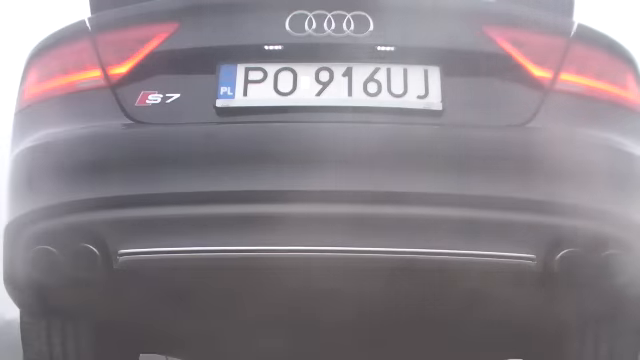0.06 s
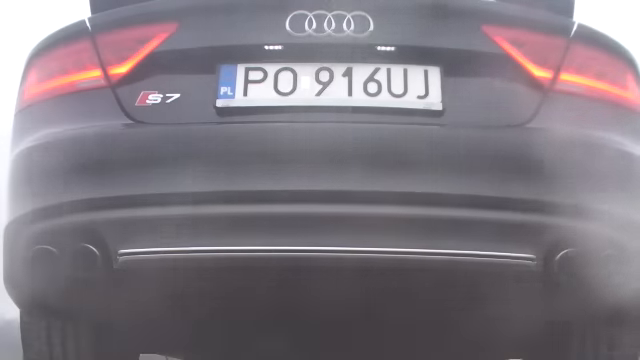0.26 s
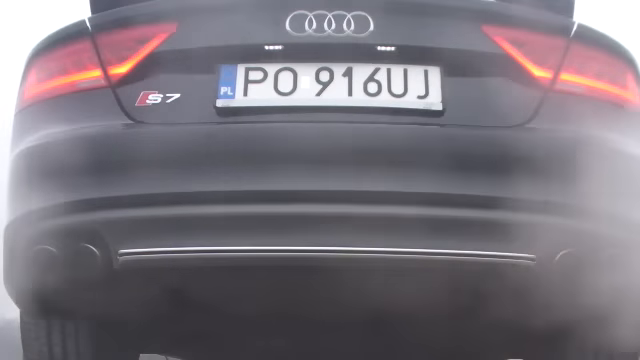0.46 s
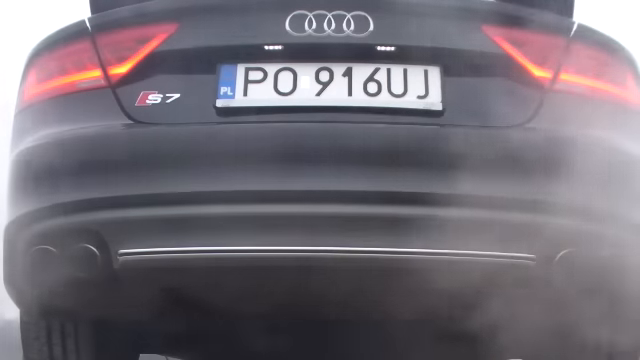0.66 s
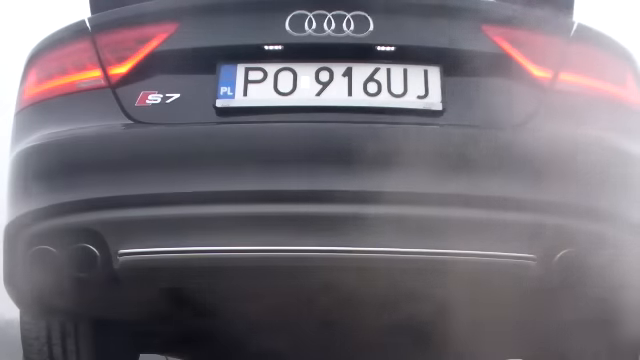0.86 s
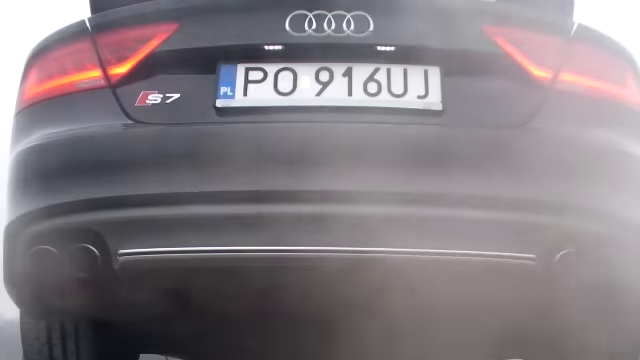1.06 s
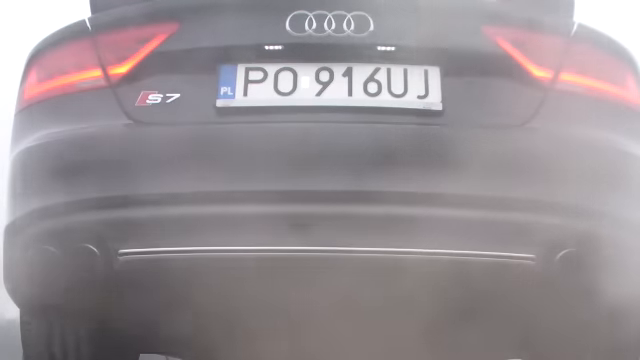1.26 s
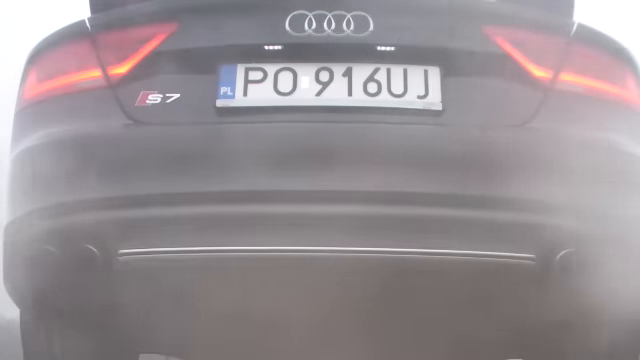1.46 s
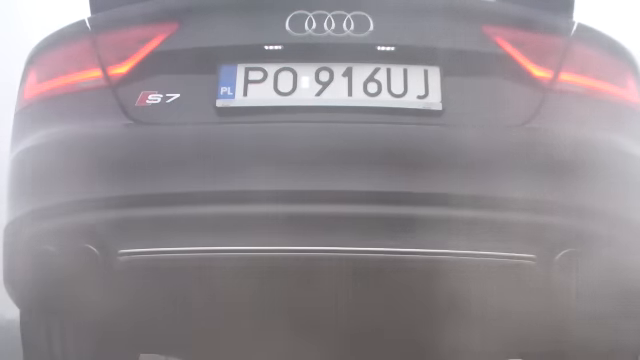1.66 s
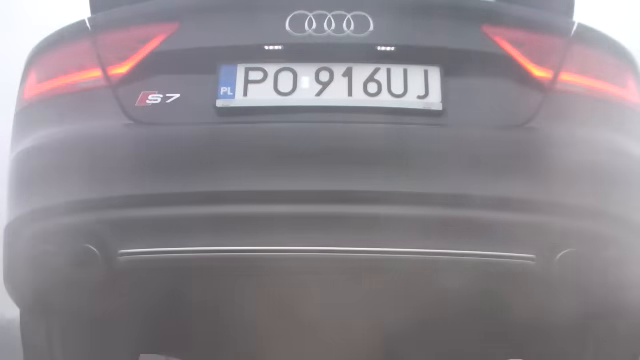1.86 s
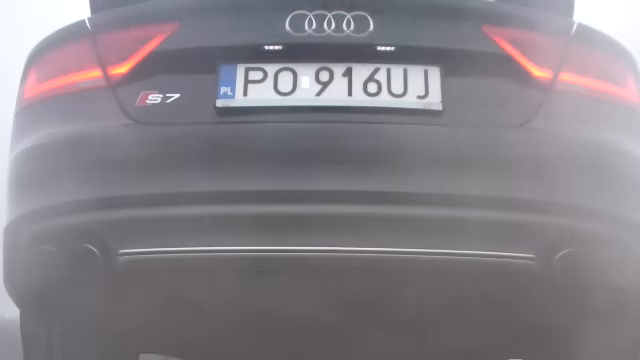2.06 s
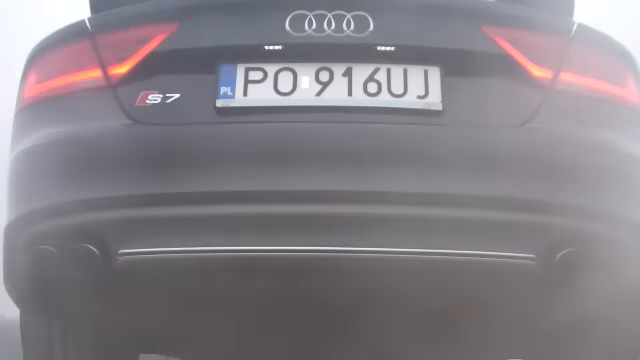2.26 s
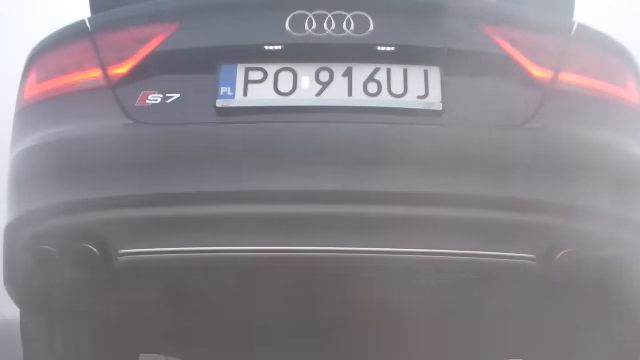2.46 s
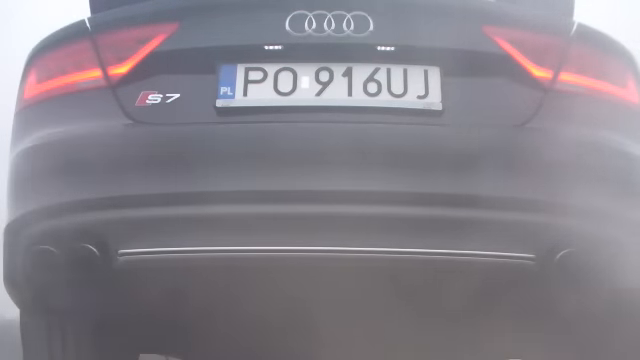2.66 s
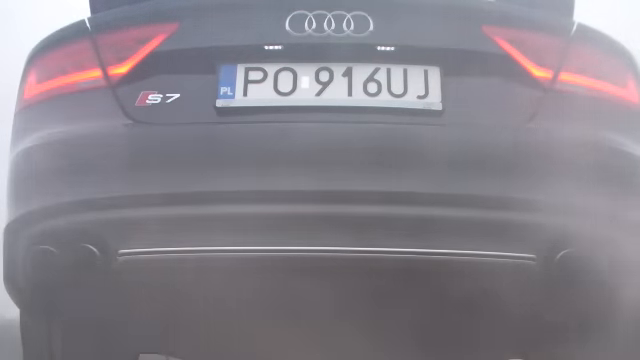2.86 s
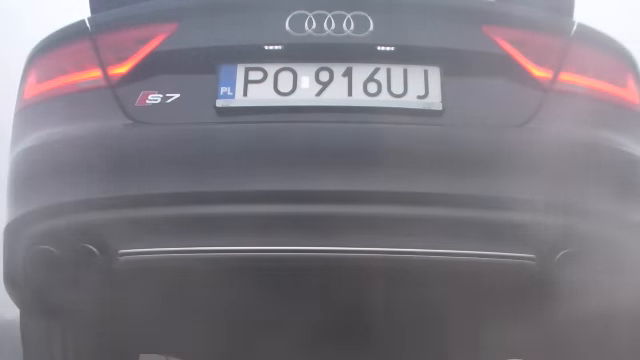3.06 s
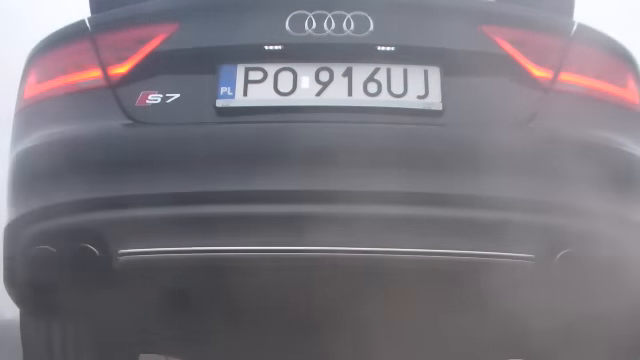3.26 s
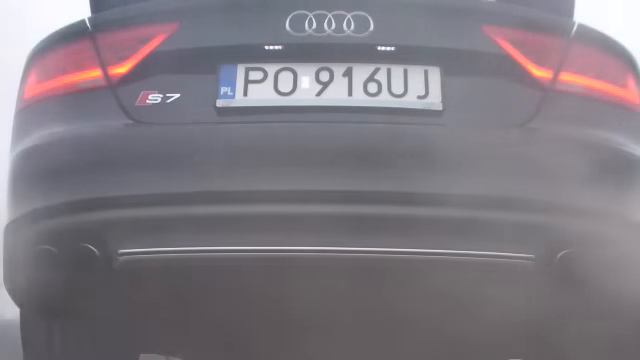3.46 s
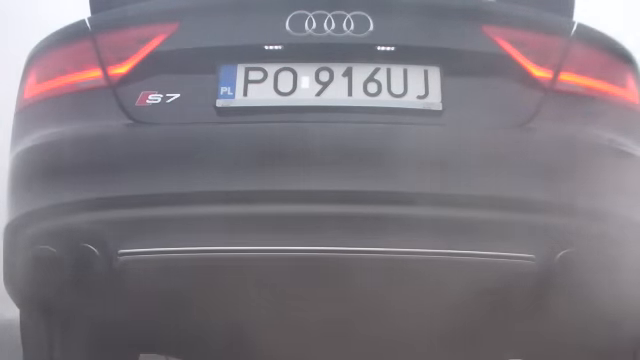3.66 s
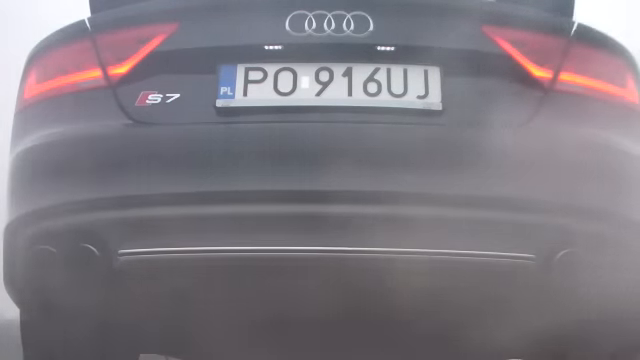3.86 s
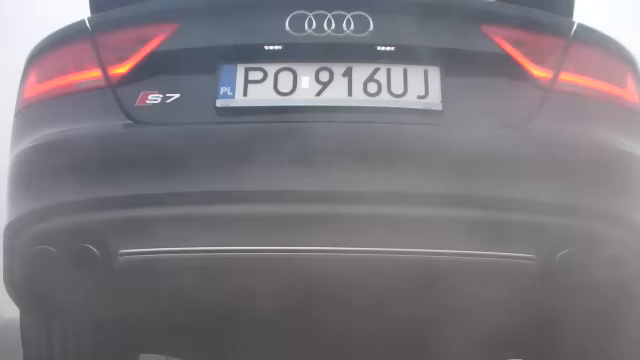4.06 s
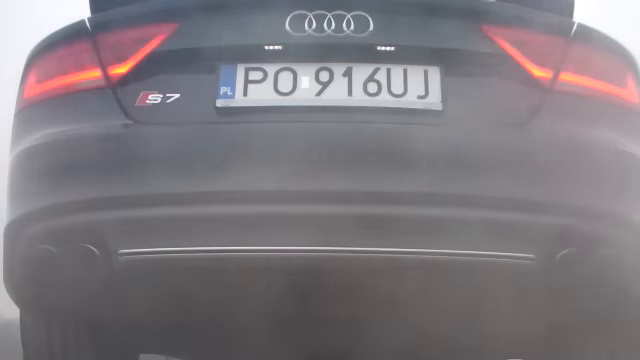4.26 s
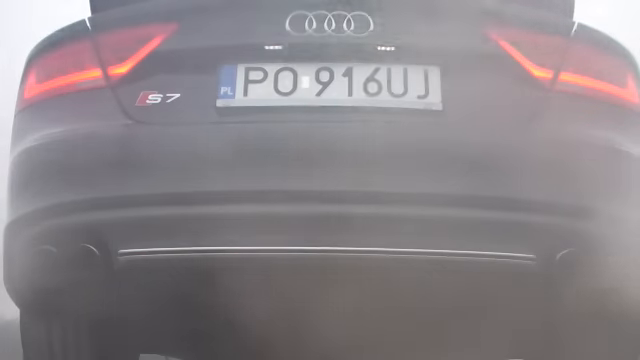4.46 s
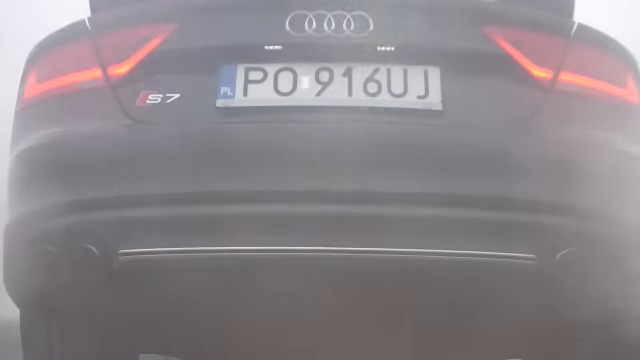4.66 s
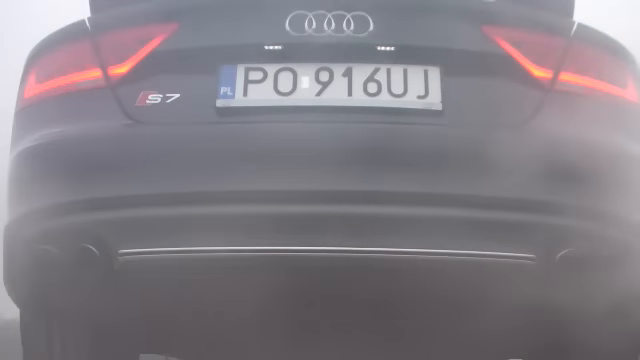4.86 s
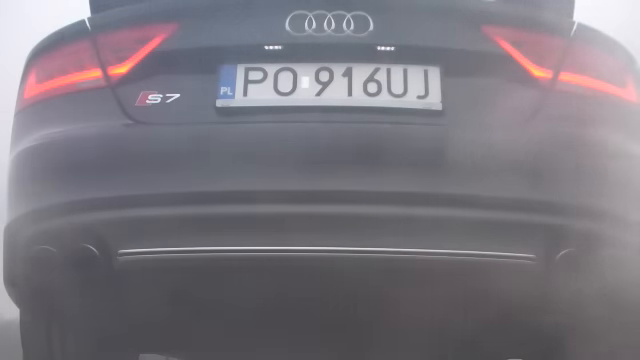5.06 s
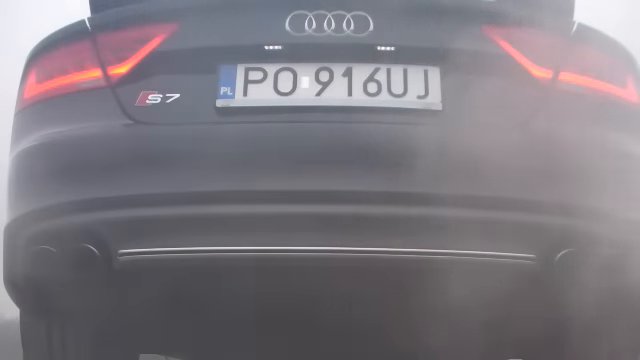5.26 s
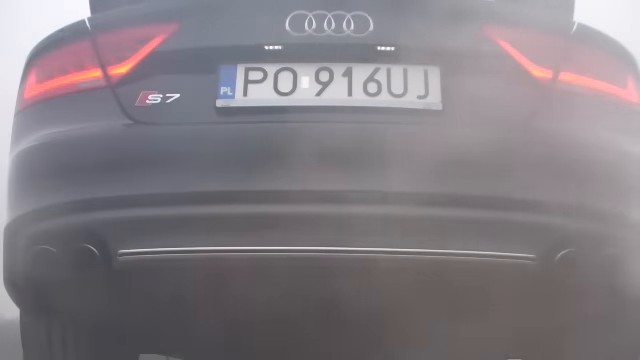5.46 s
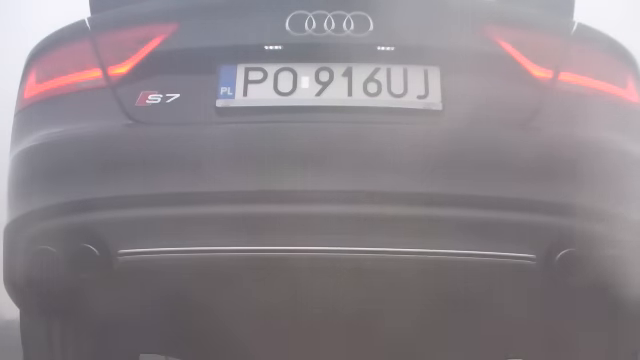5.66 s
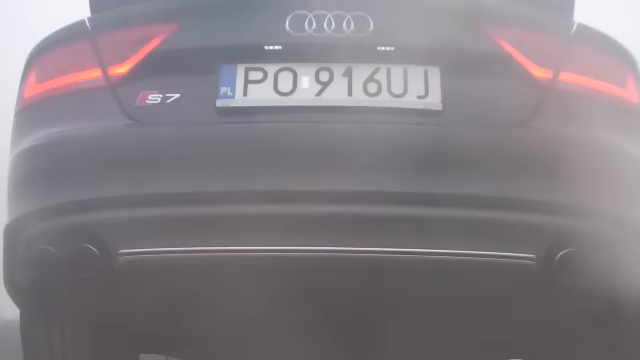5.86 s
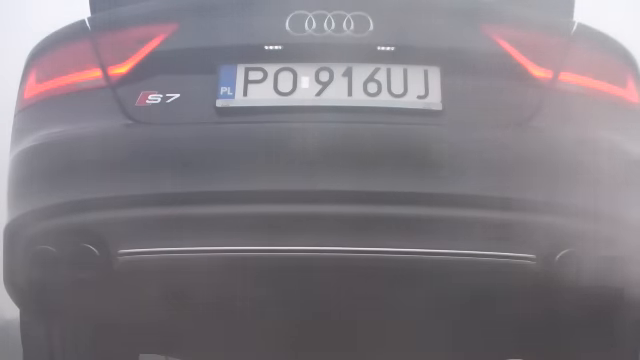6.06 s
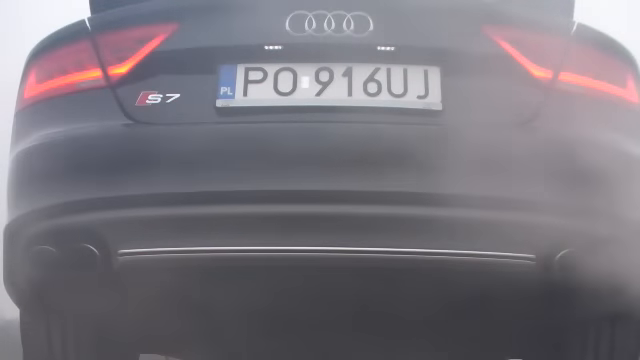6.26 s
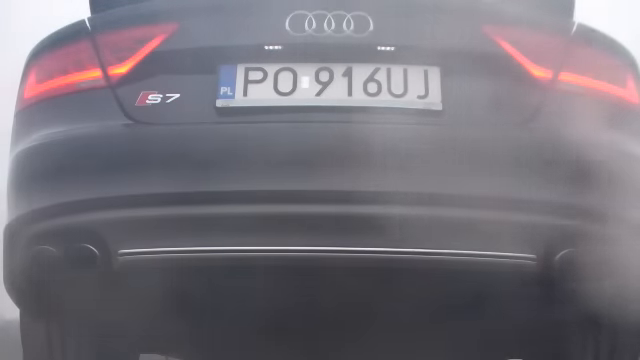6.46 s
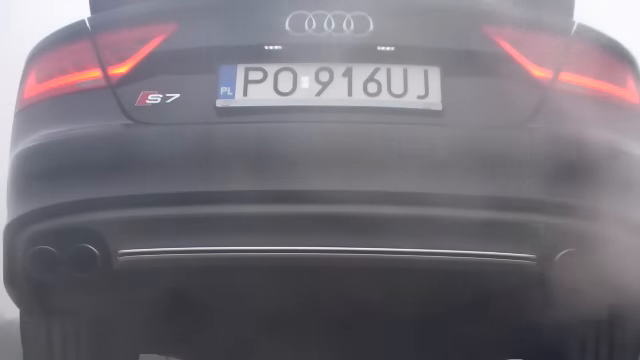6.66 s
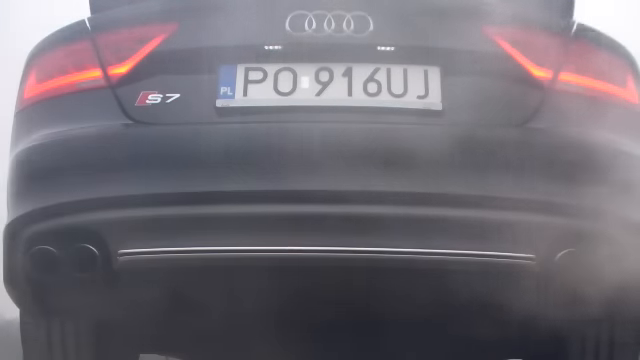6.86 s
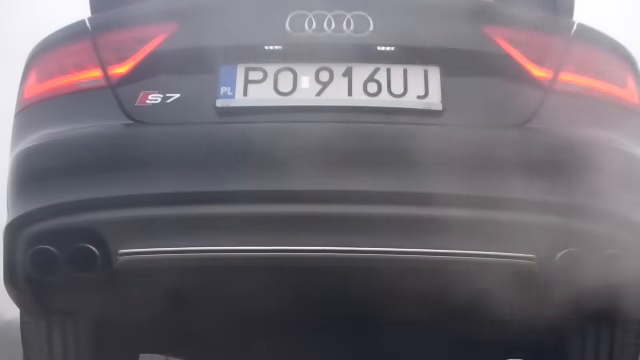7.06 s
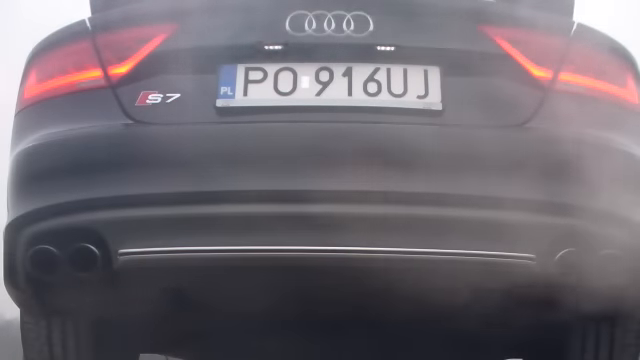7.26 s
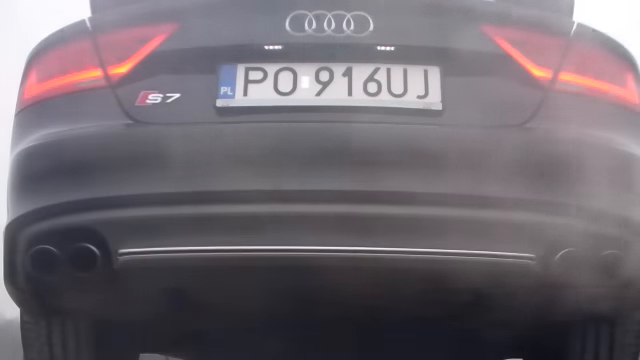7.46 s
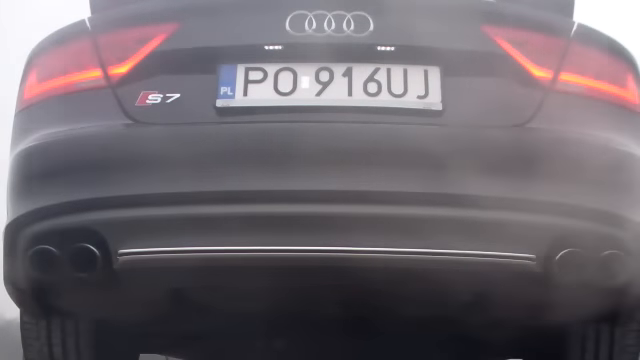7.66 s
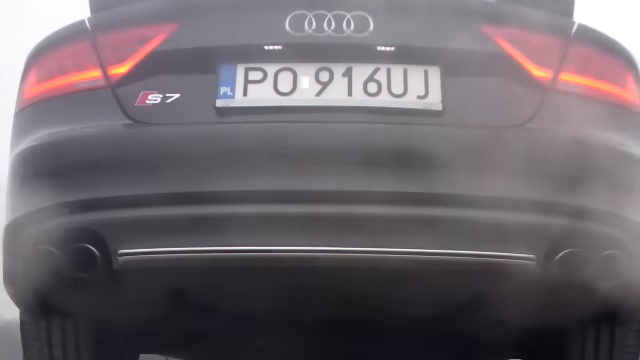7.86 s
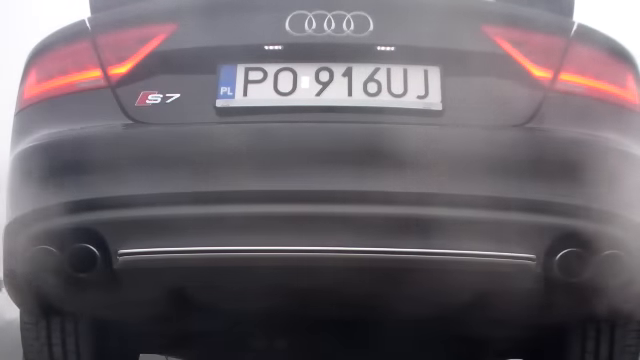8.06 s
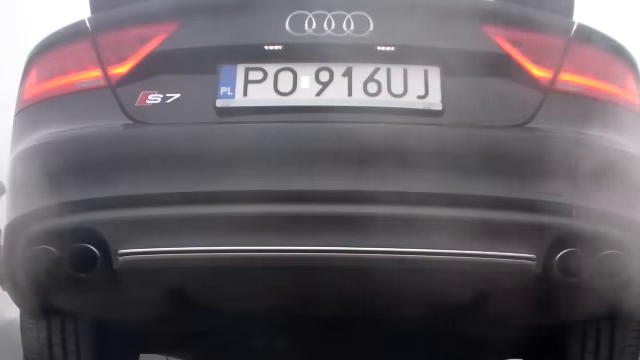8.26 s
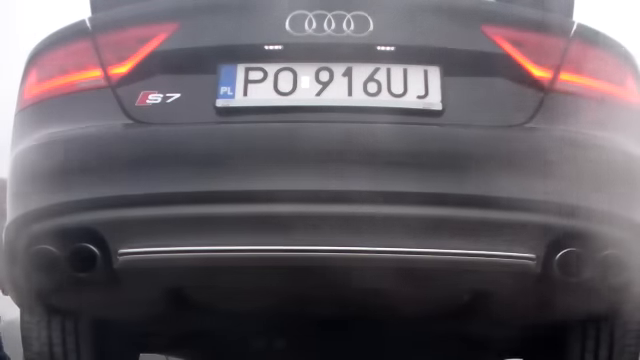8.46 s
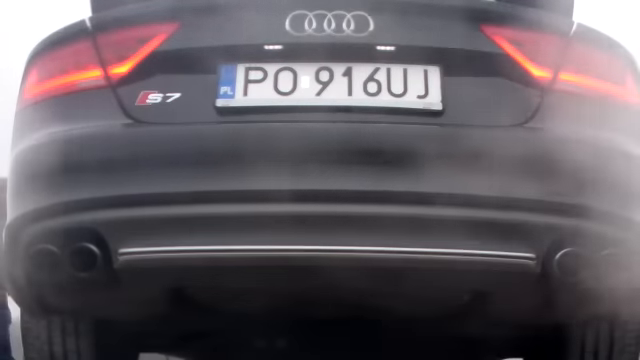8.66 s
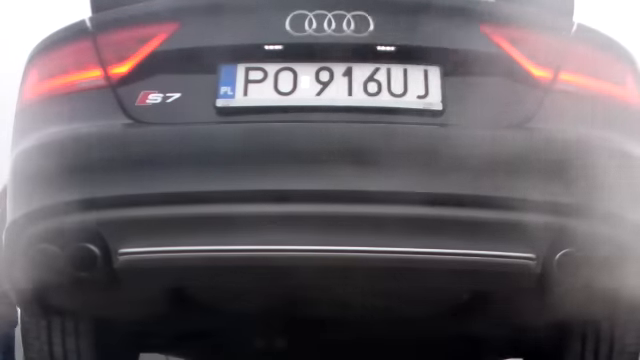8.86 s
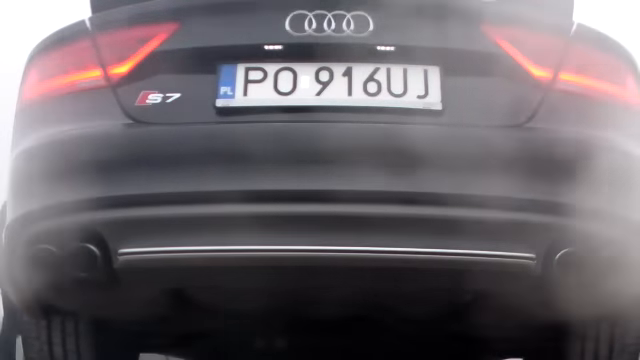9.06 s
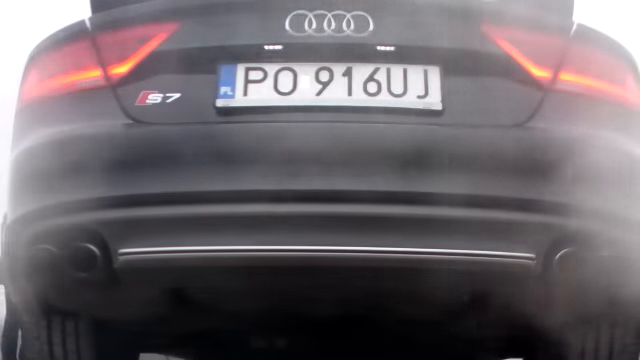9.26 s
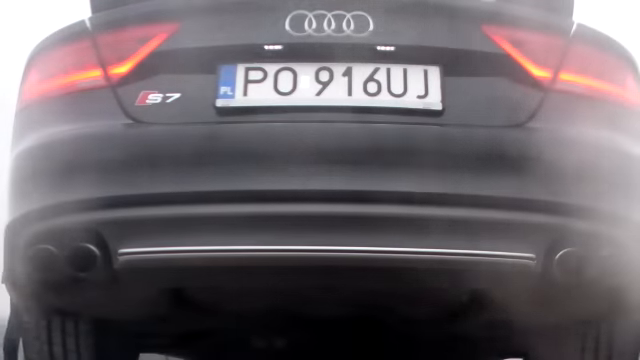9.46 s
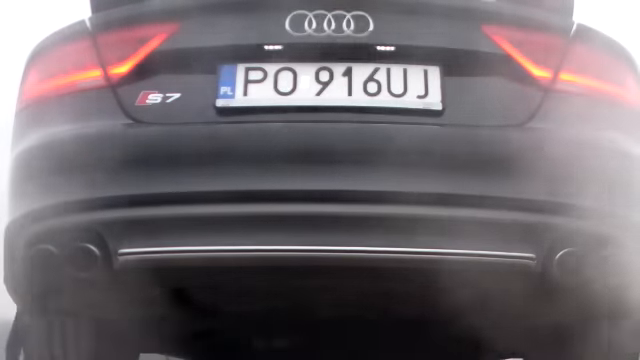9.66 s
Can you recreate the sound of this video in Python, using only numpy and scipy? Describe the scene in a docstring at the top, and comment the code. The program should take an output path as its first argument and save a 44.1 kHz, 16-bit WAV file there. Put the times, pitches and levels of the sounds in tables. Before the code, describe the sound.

A powerful eight-cylinder car engine is revved in sharp roaring blips behind its tail pipes, barking and spitting, dropping back to lumpy idle between bursts.

```python
"""An eight-cylinder engine is revved in blips against its limiter and falls back to idle, heard behind the tail
pipes. Tones locked to two unevenly firing banks boom through the pipe resonances; ragged blows and noise ring
the silencer. Coloured noise hisses as gas flow and spits at the pipe mouths; shut throttles bring thuds, late
burns bark. At high speed and roar a pitched howl sets in and a buzz rattles with the loudest peaks. A thin
geared tone whines now and then, and steady noise is the hush of the yard."""
import sys
import numpy as np
from scipy import signal
from scipy.fft import rfft, irfft
from scipy.io import wavfile
from scipy.ndimage import uniform_filter1d, minimum_filter1d

SR = 44100
rng = np.random.default_rng(int(sys.argv[2]) if len(sys.argv) > 2 else 0)


def volts(x):
    """Linear amplitude factor 10**(x/20) for a level x in dB, scalar or array-like."""
    e = np.asarray(x, float) / 20
    return 10 ** e


def int16_out(signal):
    """Quantize to a 16-bit WAV file."""
    q = np.round(np.clip(np.atleast_2d(signal).T, -1, 1) * 32767)
    wavfile.write(sys.argv[1], SR, q.astype(np.int16))


N = 428652
TIME = np.arange(N) / SR

# Openings of the throttle; pull is before the speed scaling in speed()
# [opens_s, shuts_s, pull_hz_per_s, roughness_0_to_1]
THROTTLE = [(.208, .832, 123.3, .87), (1.17, 1.42, 124.5, .55), (1.42, 2.05, 108, .97),
            (3.27, 3.718, 151.3, .54), (4.366, 4.822, 110.4, .5), (7.522, 7.835, 147.8, .24),
            (8.497, 9.089, 151.8, .45)]
# Steady exhaust levels against engine cycle rate [speed_hz, boom_db, roar_db, hiss_db]
STEADY = [(5.86, -46, -53.5, -60), (6.39, -34.5, -49, -58), (9.1, -27.5, -41, -50), (13.5, -28.5, -36, -49),
          (17.43, -29, -33, -48), (20.45, -26.5, -29, -43.5), (23.62, -28.5, -29, -43),
          (28.79, -26, -23, -42.5), (30.464, -28, -23, -42)]
# Surges of burnt gas over the steady level [start_s, peak_s, end_s, roar_rise_db, hiss_rise_db]
SURGES = [(0.208, 0.489, 0.63, 11.5, 10.5), (0.557, 0.691, 0.86, 10.5, 9.5),
          (1.229, 1.343, 1.437, 15.5, 15.5), (1.464, 1.567, 1.63, 14, 12.5), (1.753, 1.82, 1.84, 7.5, 5.5),
          (1.938, 2.019, 2.25, 4, 3), (3.36, 3.694, 3.783, 13.5, 14), (4.377, 4.556, 4.85, 12.5, 12),
          (4.614, 4.747, 4.88, 3.5, -2), (7.676, 7.858, 7.98, 7, 8.5), (8.626, 8.981, 9.27, 12.5, 13),
          (9, 9.078, 8.78, 7.5, 1)]
# Brief changes in the level of the gas hiss [time_s, hiss_change_db]
HISS_CHANGES = [(.556, -2), (.638, -2), (1.415, 2), (4.41, -4)]
# Relative strength of each cylinder's blow, in firing order [level_db]
CYLINDER_DB = [6.5, -15.5, 4, -28, 4.5, -13.5, 0.5, 4.5]
# Tones of the uneven firing, relative [multiple_of_cycle, coasting_db, firing_db]
FIRING_TONES = [(2, -22, -14.5), (3, -2, -7.5), (4, -13, -3.5), (5, -2, -5), (6, -6.5, -5), (7, -11, -7),
                (8, -5, 2), (9, -10.5, -11.5), (10, -12, -11), (11, -5, -15)]
# Transmission of the tail pipes [frequency_hz, gain_db]
PIPE_RESPONSE = [(20, -37), (45, -0.5), (75, 1.5), (100, 1), (125, 4), (150, 0.5), (200, -13), (240, -10),
                 (300, -25), (500, -46), (1500, -95)]
# Harder firings that make the idle lumps lurch [time_s, rise_db]
LOPES = [(6.3, 5), (6.451, 9), (6.585, 7), (6.7, 4), (6.85, 6), (6.96, 13.5), (7.125, 9), (7.27, 5),
         (7.385, 10), (7.555, 8)]
# Resonances of the silencer chambers [frequency_hz, width_hz, gain_db]
SILENCER_MODES = [(374.8, 36, -7.5), (435, 42, 0), (490.3, 46.4, -1), (546, 28, -1.5), (601.4, 55, -4.5),
                  (736, 121, -14), (793, 226, -23), (345, 83, -14.5)]
# Tones of the howl, relative [multiple_of_cycle, level_db]
HOWL_TONES = [(12, -15), (14, 2), (16, 1.5), (18, -8.5), (20, -6.5)]
# Spectrum of the gas hiss, relative [frequency_hz, level_db_per_hz]
HISS_SPECTRUM = [(530, -3), (900, -1), (1060, -8.5), (1430, -15), (1980, -11.5), (2200, -11.5), (3610, -4),
                 (4300, -12), (5620, -13.5), (6000, -17.5), (7050, -19.5), (7770, -13.5), (10100, -10),
                 (11800, -20.5), (15400, -53), (22000, -120)]
# Whine passages, before their random waver [start_s, end_s, multiple_of_cycle, level_db]
WHINES = [(-.1, .2, 52, -47), (.6, .95, 28, -39), (1.45, 2.15, 28, -36), (2.65, 3.05, 52, -52),
          (4.65, 5.05, 28, -39), (5.5, 5.8, 52, -48)]
# Spectrum of the yard hush, relative [frequency_hz, level_db_per_hz]
YARD_SPECTRUM = [(88, -36), (150, -0.5), (245, -3.5), (575, -1.5), (1590, -22), (5560, -32.5), (6790, -31),
                 (11500, -32), (15000, -62), (22000, -120)]
# Unburnt fuel spitting at the pipe mouths, held and then fading [start_s, level_db, hold_s]
SPITS = [(0.488, -38, 0.009), (0.518, -32.5, 0.0071), (0.579, -23, 0.021), (0.665, -33, 0.01),
         (0.873, -42, 0.013), (1.275, -39, .01), (1.326, -47, 0.011), (1.367, -32.5, .008),
         (1.427, -29.5, 0.029), (1.568, -37, 0.011), (2.016, -47, .01), (2.624, -51, 0.0089),
         (3.462, -45, 0.017), (3.507, -44, 0.0081), (3.633, -38, .01), (4.247, -42.5, 0.0083),
         (4.468, -39, 0.011), (4.537, -59, 0.0067), (5.337, -46, 0.013), (5.38, -47.5, 0.022),
         (5.997, -49, 0.0091), (8.854, -47, 0.0071), (8.896, -48, 0.011), (8.932, -44, 0.012),
         (8.963, -34, 0.012), (8.9984, -29.5, 0.012)]
# Late burns barking into the silencer [time_s, peak_db]
BARKS = [(0.521, -9), (0.577, -8), (0.662, -7), (0.677, -5), (0.686, -3), (0.865, -10), (.915, -14),
         (1.289, -3.5), (1.335, 1), (1.358, -25), (1.545, 1), (1.577, -5), (3.604, -10), (3.642, -8.5),
         (3.685, -23), (4.459, -10.5), (4.554, -16), (4.584, -3), (4.618, -6.5), (4.721, -8), (8.944, -3.5),
         (8.998, -9.5), (9.033, -5.5), (9.064, -7)]
# Thuds as the throttle shuts [time_s, level_db, pitch_hz]
THUDS = [(0.839, -12.5, 83), (1.437, -15, 69.6), (1.859, -18, 67.6), (1.997, -12.5, 69.4),
         (3.751, -12, 53.74), (4.772, -12.5, 62.4), (9.12, -19, 88)]

# Engine speed, in four-stroke cycles per second; the pull fades over the band below the limiter
START_HZ, IDLE_HZ, LIMITER_HZ, LIMITER_BAND_HZ = 17.86, 5.76, 32.23, 9.21
# Friction grows with speed and eases off near idle over CATCH_HZ
DRAG_HZ_PER_S, DRAG_PER_S, CATCH_HZ, INTAKE_LAG_S, STEP_S = 13.89, .195, 2.85, .033, .005
FIRE_LAG_S, GAS_LAG_S = .05, .019
# Above HARD_DB of roar the shaft overshoots and the howl grows in
HARD_DB, HOWL_OVER_DB, OVERSHOOT_HZ_PER_DB = -23, 7, .12
HOWL_FROM_HZ, HOWL_FULL_HZ, HOWL_SHARE = 26, 30, .85
# Coasting through this speed the pipes drone
DRONE_HZ, DRONE_WIDTH_HZ, DRONE_DB = 24.74, 2.1, 8
# The flow sags as each surge starts; the boom stumbles as the throttle opens; the roar drops at each thud
SAG_DB, SAG_S, STUMBLE_DB, STUMBLE_S, STUMBLE_LAG_S = -1.5, .017, -3.5, .039, .042
SHUT_DB, SHUT_S, HISS_CHANGE_S = -5, .03486, .0077
BOOM_SHARE = .59  # dB of boom rise per dB of roar rise
REFIRE_HZ, COAST_ROUGH, IDLE_ROUGH = 13.4, .1, .55
COAST_WOBBLE_DB, FIRE_WOBBLE_DB = 1.9, 1.1
LOPE_S, BETWEEN_LOPES_DB = .03, -3
# Once a cycle the gas puffs; its decay is a share of the cycle
PUFF_MAX_DB, PUFF_SHARE = 3.4, .25
WAVER, WAVER_HZ = .008, 9  # relative pitch waver of the whine and its rate
YARD_DB, SPIT_T60_S = -50.5, .055
LIMIT, LIMIT_S, TOP_HZ = .95, .012, 11900


def unit(x):
    """Normalise a signal to unit rms pressure."""
    return x / np.sqrt(np.mean(x ** 2))


def coloured(x, points):
    """A transfer function shapes the spectrum, its dB gain interpolated over log frequency."""
    hz, db = np.transpose(points)
    bins = np.fft.rfftfreq(N, 1 / SR) + 1
    gain = volts(np.interp(np.log(bins), np.log(hz), db))
    return irfft(rfft(x) * gain, N)


def ring(x, hz, width_hz):
    """Two cascaded resonators give one steep resonance with unit gain at its centre."""
    stage = np.concatenate(signal.iirpeak(hz, hz / width_hz, fs=SR))
    return signal.sosfilt(np.tile(stage, (2, 1)), x)


def walk(rate_hz):
    """Band-limited fluctuation: held random levels smoothed twice, with spread near 1."""
    hold = int(SR / rate_hz)
    steps = np.repeat(rng.standard_normal(N // hold + 1), hold)
    return 1.3 * uniform_filter1d(uniform_filter1d(steps, hold), hold)[:N]


def span(start, end, fade_s):
    """A gate: 1 between two times, fading linearly at both ends."""
    return np.clip(np.minimum(TIME - start, end - TIME) / fade_s + .5, 0, 1)


def bump(x, width):
    """A Gaussian pulse of height 1 about x = 0."""
    return np.exp(-(x / width) ** 2)


def speed():
    """Angular momentum balance: throttle torque lifts the shaft to the limiter, friction returns it to idle."""
    t = np.arange(0, N / SR, STEP_S)
    pedal = sum(pull * np.interp(t, TIME, span(start, end, .03)) for start, end, pull, _ in THROTTLE)
    hz, air, out = START_HZ, 0, []
    for pull in pedal:
        air += (pull - air) * STEP_S / INTAKE_LAG_S
        limiter = min(max((LIMITER_HZ - hz) / LIMITER_BAND_HZ, 0), 1)
        push = air * hz / LIMITER_HZ * limiter
        drag = (DRAG_HZ_PER_S + DRAG_PER_S * hz) * np.tanh((hz - IDLE_HZ) / CATCH_HZ)
        hz += STEP_S * (push - drag)
        out.append(hz)
    return np.interp(TIME, t, out)


def fuelled(fade_s):
    """Delayed combustion: for each throttle opening, 1 while the cylinders get fuel."""
    return np.array([span(start + FIRE_LAG_S, end + FIRE_LAG_S, fade_s) for start, end, _, _ in THROTTLE])


def any_fuel(fade_s):
    """Combustion over all openings together, from 0 (coasting) to 1 (fuelled)."""
    return np.clip(fuelled(fade_s).sum(axis=0), 0, 1)


def levels(hz):
    """Source strength follows gas flow: boom, roar and hiss in dB from engine speed and surges."""
    at_hz, *columns = np.transpose(STEADY)
    boom_db, roar_db, hiss_db = (np.interp(hz, at_hz, column) for column in columns)
    # the flow at the pipe mouths trails the shaft
    hiss_db = np.interp(TIME - GAS_LAG_S, TIME, hiss_db)
    shapes = np.array([np.interp(TIME, row[:3], [0, 1, 0]) for row in SURGES])
    sag_db = sum(SAG_DB * bump(TIME - row[0], SAG_S) for row in SURGES)
    surge_db, gas_db = np.array(SURGES)[:, 3:].T @ shapes + sag_db
    gas_db += sum(db * bump(TIME - s, HISS_CHANGE_S) for s, db in HISS_CHANGES)
    boom_db += DRONE_DB * bump(hz - DRONE_HZ, DRONE_WIDTH_HZ) * (1 - any_fuel(.05))
    boom_db += sum(STUMBLE_DB * bump(TIME - row[0] - STUMBLE_LAG_S, STUMBLE_S) for row in THROTTLE)
    roar_db += sum(SHUT_DB * bump(TIME - row[0] - SHUT_S / 2, SHUT_S) for row in THUDS)
    return boom_db + BOOM_SHARE * surge_db, roar_db + surge_db, hiss_db + gas_db


def blows(cycles, scatter_db, signed):
    """An impulse train, eight unequal firings a cycle, scaled to keep its power steady at any speed."""
    at = np.flatnonzero(np.diff(np.floor(8 * cycles)))
    chance = rng.standard_normal((N // 100, 2))[:len(at)]
    size_db = np.resize(CYLINDER_DB, len(at)) + scatter_db * chance[:, 0]
    sign = 1 - signed + signed * chance[:, 1]
    spacing = np.gradient(1. * at)
    out = np.zeros(N)
    out[at] = volts(size_db) * sign * np.sqrt(spacing)
    return unit(out)


def boom(hz, cycles):
    """Periodic firing excites a harmonic series through the pipes; unequal firings add random lumps."""
    throttle = any_fuel(.042)
    # a coasting engine only pumps air until fuel returns near idle
    refire = 1 / (1 + (hz / REFIRE_HZ) ** 6)
    firing = np.maximum(throttle, refire)
    pulled_rough = np.transpose(THROTTLE)[-1] @ fuelled(.041)
    rough = pulled_rough + (1 - throttle) * (COAST_ROUGH + IDLE_ROUGH * refire)
    rough = np.clip(rough, 0, .95)
    tones, power = 0, 0
    pipe_hz, pipe_db = np.transpose(PIPE_RESPONSE)
    for k, coast_db, fire_db in FIRING_TONES:
        source_db = coast_db + firing * (fire_db - coast_db)
        passed_db = np.interp(np.log(k * hz), np.log(pipe_hz), pipe_db)
        wobble_db = (COAST_WOBBLE_DB + FIRE_WOBBLE_DB * firing) * walk(13)
        gain = volts(source_db + passed_db + wobble_db)
        tones = tones + gain * np.sin(2 * np.pi * (k * cycles + rng.random()))
        power = power + gain ** 2 / 2
    tones = tones / np.sqrt(uniform_filter1d(power, SR // 8))
    # near idle the firings lope unevenly
    lope_db = BETWEEN_LOPES_DB * refire + sum(db * bump(TIME - s, LOPE_S) for s, db in LOPES)
    lump_source = blows(cycles, scatter_db=2.1, signed=.98) + 1.02 * rng.standard_normal(N)
    lumps = unit(coloured(lump_source, PIPE_RESPONSE)) * volts(2 * refire * walk(12) + lope_db)
    return np.sqrt(1 - rough ** 2) * tones + rough * lumps


def buffet(boom_db):
    """Low-frequency turbulence that follows the boom level."""
    points = [(20, -10), (45, 11), (120, 14), (400, -39)]
    return volts(boom_db - 17) * unit(coloured(rng.standard_normal(N), points))


def silencer(push):
    """Modal superposition: parallel chamber resonances ring with whatever pushes them."""
    return sum(volts(db) * ring(push, hz, width_hz) for hz, width_hz, db in SILENCER_MODES)


def ragged_roar(cycles):
    """Forced resonance: soft firing blows and once-a-cycle bursts of turbulence drive the silencer."""
    soft = coloured(blows(cycles, scatter_db=1.5, signed=.25), [(450, 0), (600, -5), (800, -14), (2000, -45)])
    burst_db = 1.5 * walk(30) + 6 * np.exp(-(cycles % 1) / PUFF_SHARE)
    turbulence = volts(burst_db) * .75 * rng.standard_normal(N)
    return unit(silencer(.9 * soft + turbulence))


def gas_noise():
    """Jet noise: a coloured common part, with an opposed part between the sides mostly in the treble."""
    mid, other = (unit(coloured(rng.standard_normal(N), HISS_SPECTRUM)) for _ in range(2))
    points = [(1000, -67), (2200, -21.5), (3500, -44.5), (4200, -17), (5000, -6), (8000, -9.5), (11000, -6.5)]
    side = coloured(other - .18 * mid, points)
    return mid + side * np.array([[1], [-1]])


def gas_flutter(cycles):
    """Amplitude modulation of the gas flow: random flutter and a puff of random size each cycle."""
    flutter = volts((1.1 + .3 * any_fuel(.05)) * walk(45))
    size = rng.random(N // 1000)[cycles.astype(int)]
    puff_db = PUFF_MAX_DB * size * np.exp(-(cycles % 1) / PUFF_SHARE)
    return unit(flutter * volts(puff_db))


def whine(cycles):
    """A gear ratio fixes a thin tone to the shaft; its pitch and level waver and it fades in and out."""
    cycles = np.cumsum(np.gradient(cycles) * (1 + WAVER * walk(WAVER_HZ)))
    tones = sum(volts(db) * span(start, end, .043) * np.sin(2 * np.pi * k * cycles)
                for start, end, k, db in WHINES)
    return tones * volts(2.5 * walk(15))


def yard():
    """A diffuse ambient field: steady coloured noise with a weak opposed part between the sides."""
    mid, side = (unit(coloured(rng.standard_normal(N), YARD_SPECTRUM)) for _ in range(2))
    return volts(YARD_DB) * (mid + volts(-34) * side * np.array([[1], [-1]]))


def howl(cycles):
    """Mode locking: firings locked to the silencer sound as shaft harmonics of wavering level and phase."""
    return unit(sum(volts(db + 2.7 * walk(25)) * np.cos(2 * np.pi * k * cycles + .5 * walk(20))
                    for k, db in HOWL_TONES))


def roar(hz, cycles, hard_db):
    """Power-sharing crossfade: the howl displaces the ragged roar at high speed and strong flow."""
    fast = np.interp(hz, [HOWL_FROM_HZ, HOWL_FULL_HZ], [0, 1])
    share = HOWL_SHARE * fast * np.minimum(hard_db / HOWL_OVER_DB, 1)
    return share * howl(cycles) + np.sqrt(1 - share ** 2) * ragged_roar(cycles)


def rasp(pressure):
    """Threshold nonlinearity: only the strongest pressure swings set off a buzz near 3.5 kHz."""
    excess = np.clip(np.abs(pressure) - .2, 0, None)
    buzz = uniform_filter1d(excess, SR // 700) * rng.standard_normal(N)
    return volts(-6) * ring(buzz, 3520, 990)


def spits():
    """Burst envelopes of burning fuel: a 4 ms rise, a hold and an exponential decay."""
    out = np.zeros(N)
    for s, db, hold_s in SPITS:
        decay_db = -60 * np.clip(TIME - s - hold_s, 0, 1) / SPIT_T60_S
        rise = np.clip((TIME - s) / .004 + .5, 0, 1)
        out += volts(db + decay_db) * rise
    return out


def barks():
    """Impulse response: single rounded pushes ring the silencer, scaled by the peak of one such ring."""
    push, shape = np.zeros(N), np.hanning(SR // 700)
    for s, db in BARKS:
        push[int(s * SR)] = volts(db)
    peak = np.max(np.abs(silencer(np.pad(shape, (0, SR // 10)))))
    return silencer(np.convolve(push, shape, "same")) / peak


def thuds():
    """Damped column oscillation: a slug of gas rocks the pipe for a cycle or two."""
    out = np.zeros(N)
    for s, db, hz in THUDS:
        out += volts(db) * bump(TIME - s - .02, .0091) * np.sin(2 * np.pi * hz * (TIME - s))
    return out


def scene():
    """Superposition of engine, exhaust and yard; the bass reaches the right side more strongly."""
    hz = speed()
    boom_db, roar_db, hiss_db = levels(hz)
    hard_db = np.clip(roar_db - HARD_DB, 0, None)
    hz = hz + OVERSHOOT_HZ_PER_DB * hard_db
    cycles = np.cumsum(hz) / SR
    bass = volts(boom_db) * boom(hz, cycles) + thuds()
    body = volts(roar_db) * roar(hz, cycles, hard_db) + barks()
    # at full flow the two main chambers drown the others
    others = coloured(body, [(370, 4), (415, -18), (525, -14), (620, .5), (750, .5)])
    body = body - (1 - volts(-.35 * hard_db)) * others
    middle = bass + body + rasp(body) + whine(cycles)
    # lean is subtracted on the left and added on the right
    lean = coloured(middle, [(30, -11), (70, -18), (150, -25), (300, -57), (900, -81)]) + buffet(boom_db)
    # a faint delayed copy of the roar and barks, opposed between the sides
    lean += volts(-31) * np.roll(body, SR // 150)
    gas = gas_noise() * (volts(hiss_db) * gas_flutter(cycles) + spits())
    return middle + lean * np.array([[-1], [1]]) + gas + yard()


def top_cut(x):
    """Nothing passes above the cut-off."""
    return signal.sosfilt(signal.butter(12, 11980, fs=SR, output="sos"), x)


def record(dry):
    """Peak limiting and low-pass filtering: gain ducks around the highest peaks and the top is cut."""
    reach = int(LIMIT_S * SR)
    peak = np.abs(dry).max(axis=0)
    needed = np.minimum(1, LIMIT / (peak + 1e-9))
    gain = uniform_filter1d(minimum_filter1d(needed, 2 * reach), reach)
    low_pass = signal.ellip(8, .2, 70, TOP_HZ, fs=SR, output="sos")
    mix = signal.sosfilt(low_pass, gain * dry)
    return top_cut(mix)


dry = scene()
out = record(dry)
int16_out(out)
```